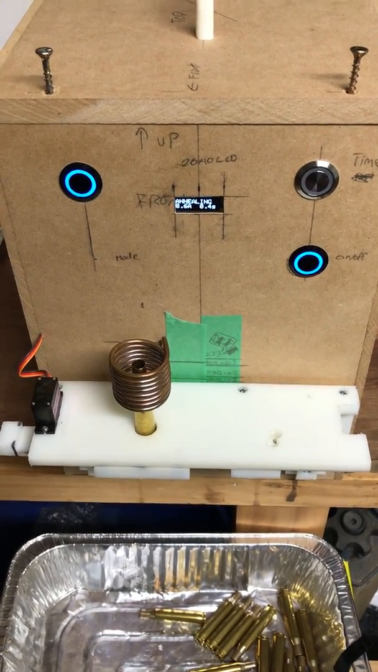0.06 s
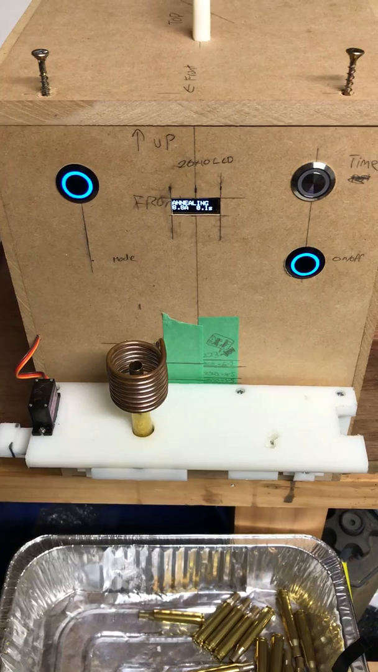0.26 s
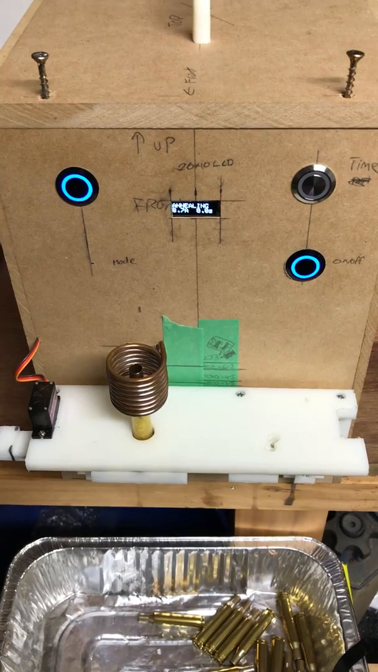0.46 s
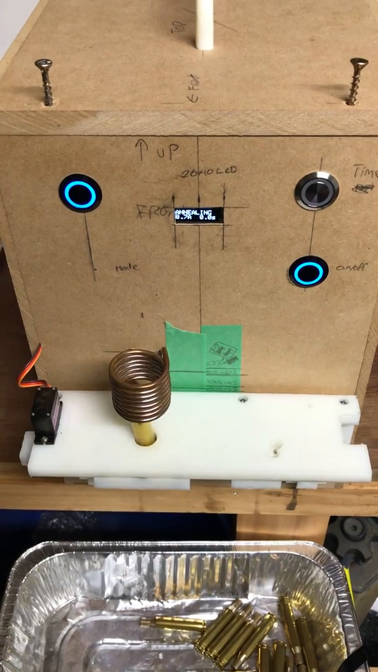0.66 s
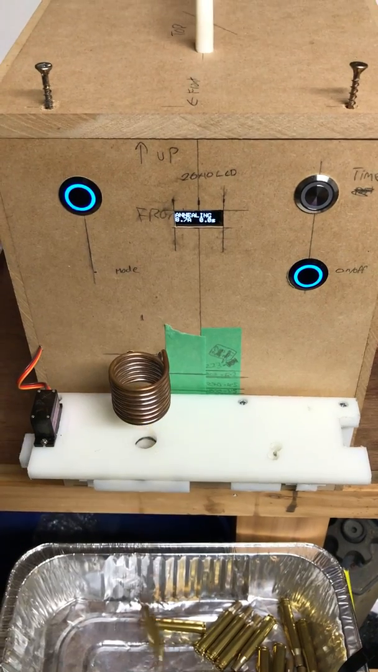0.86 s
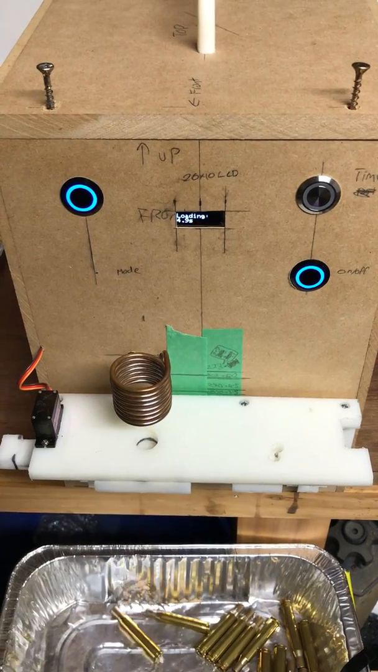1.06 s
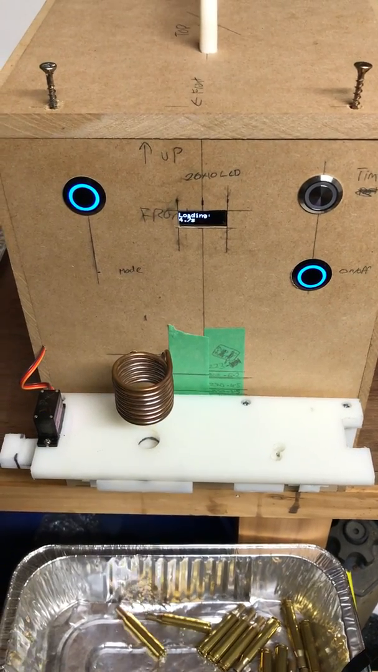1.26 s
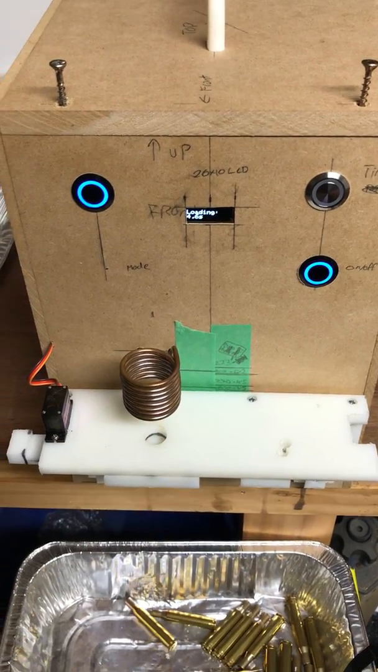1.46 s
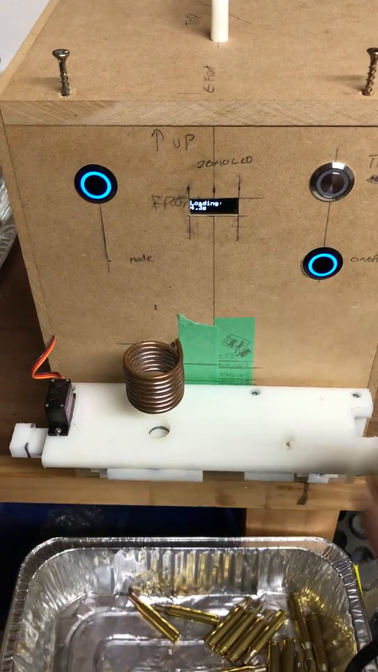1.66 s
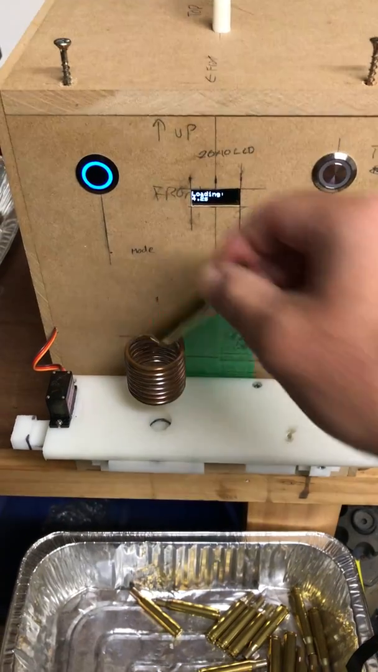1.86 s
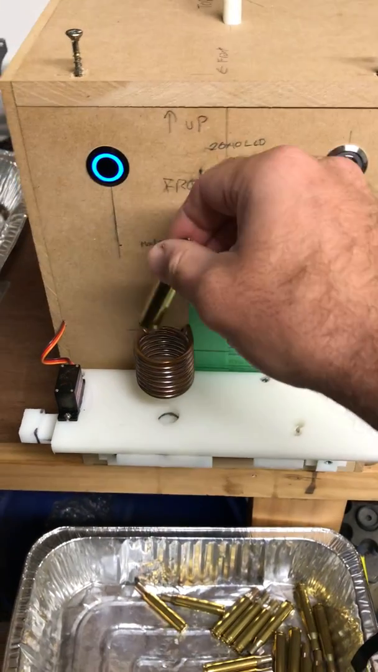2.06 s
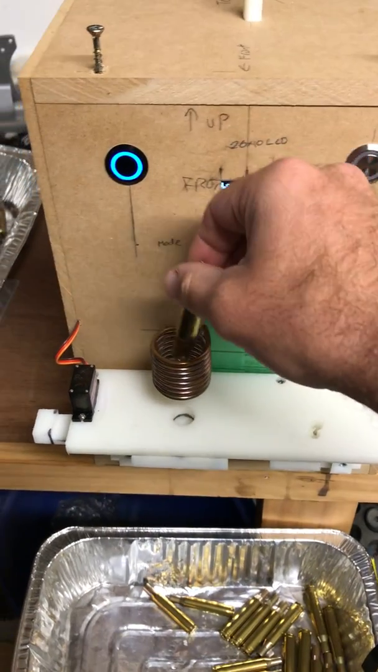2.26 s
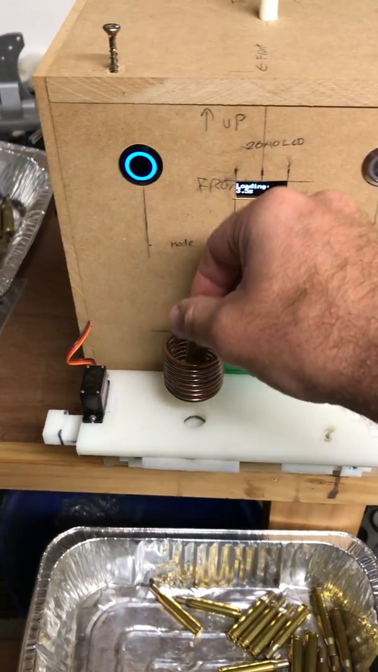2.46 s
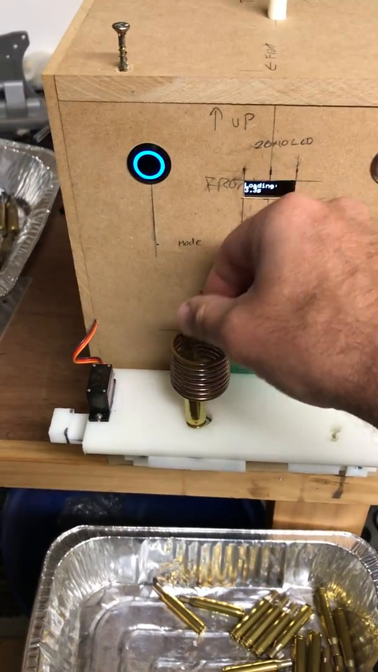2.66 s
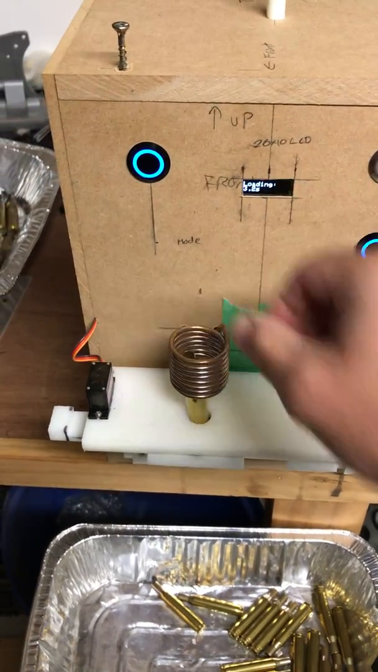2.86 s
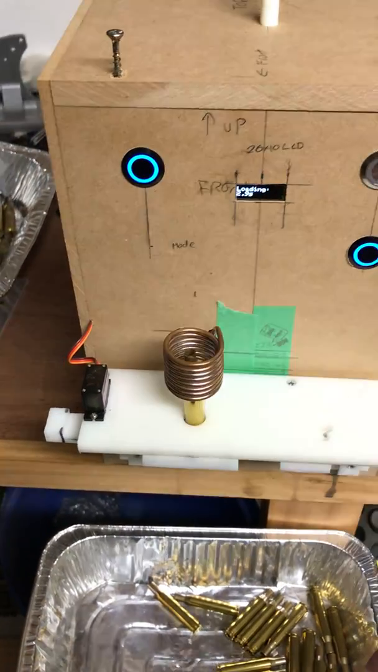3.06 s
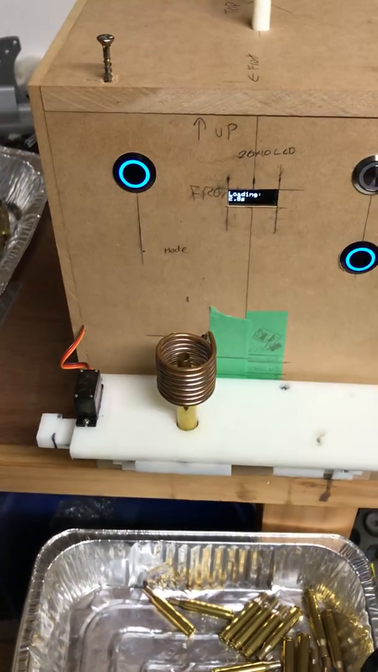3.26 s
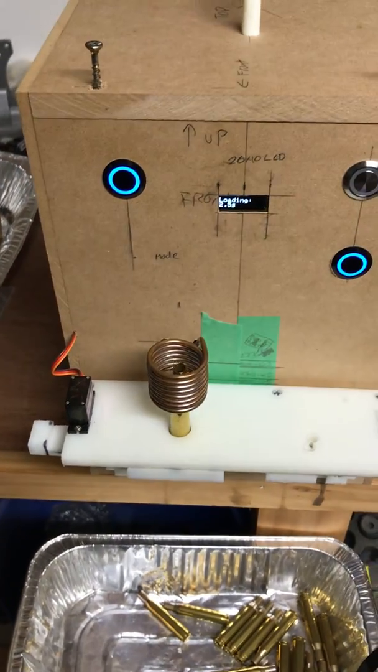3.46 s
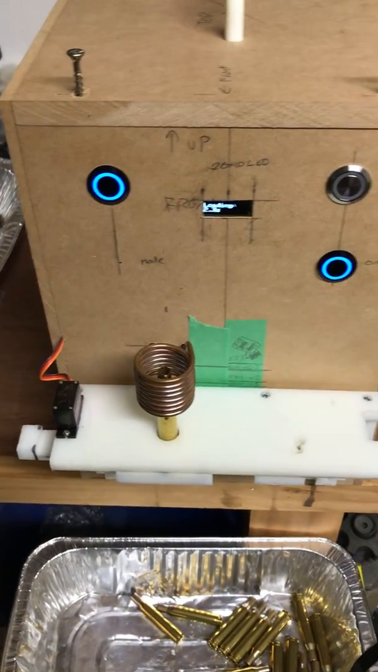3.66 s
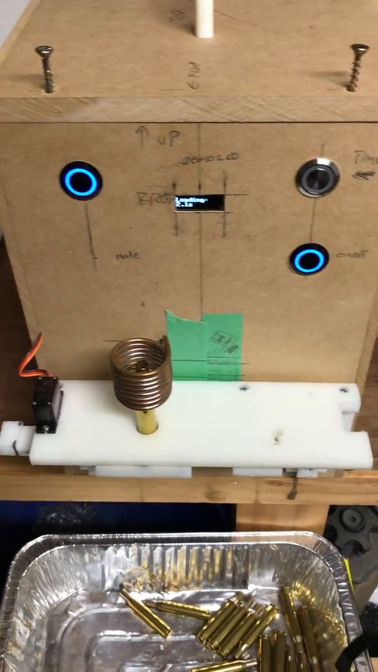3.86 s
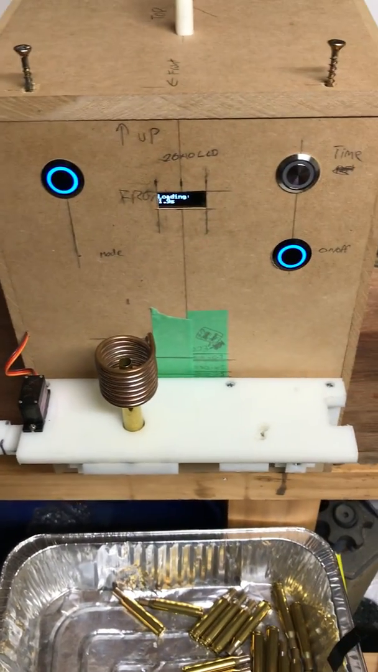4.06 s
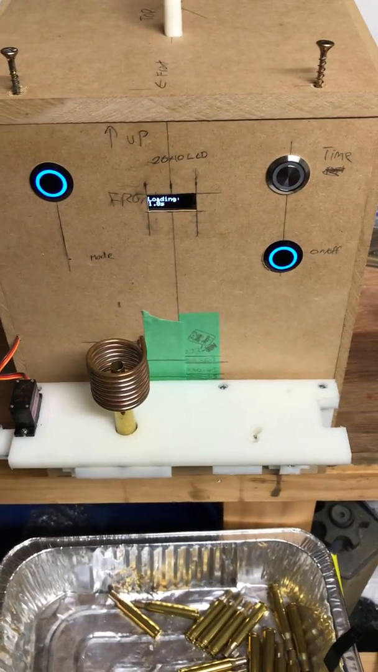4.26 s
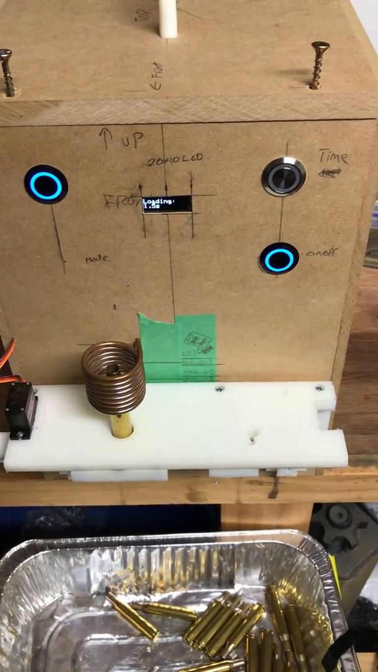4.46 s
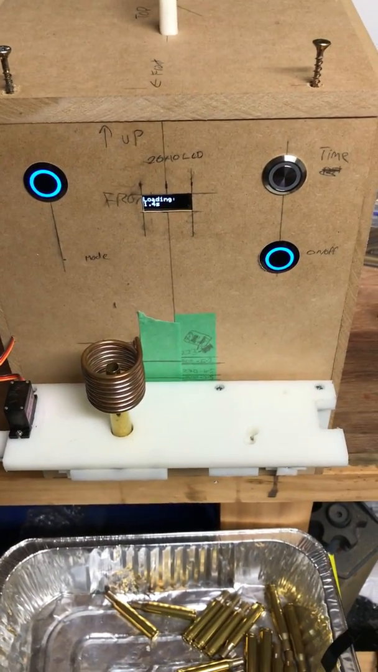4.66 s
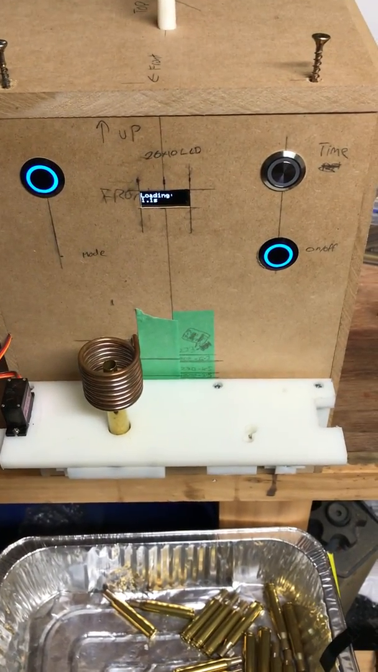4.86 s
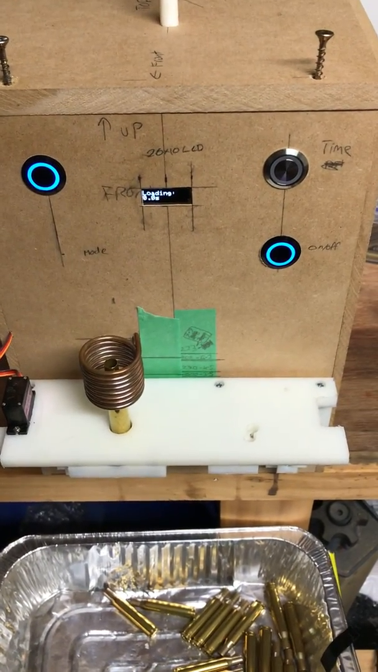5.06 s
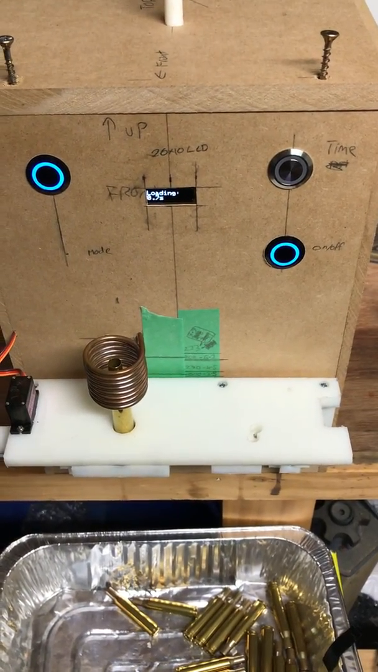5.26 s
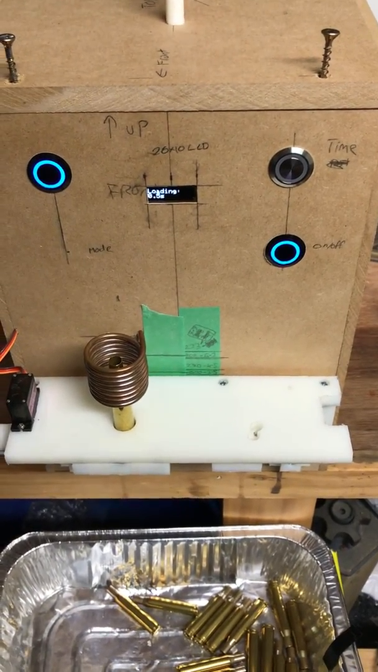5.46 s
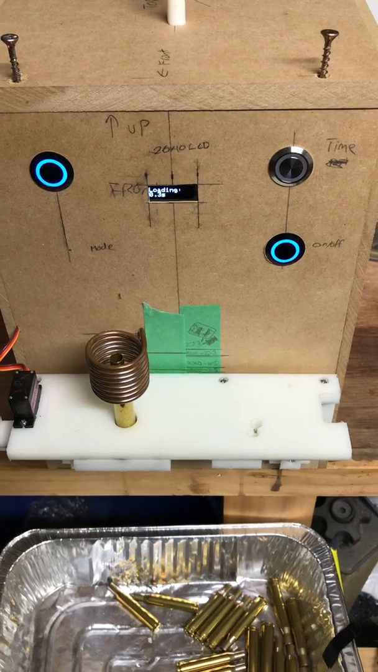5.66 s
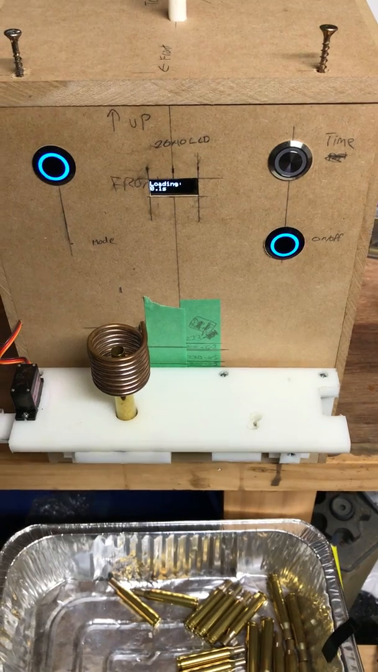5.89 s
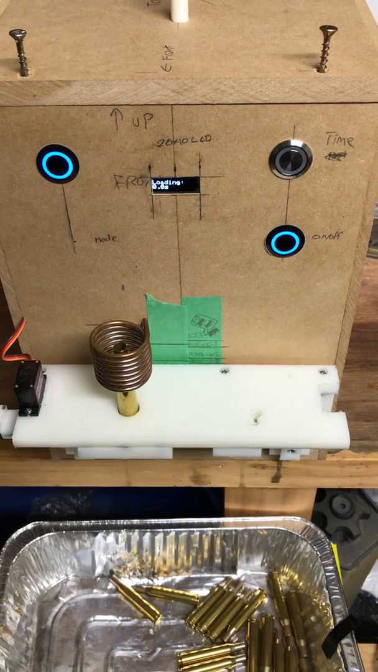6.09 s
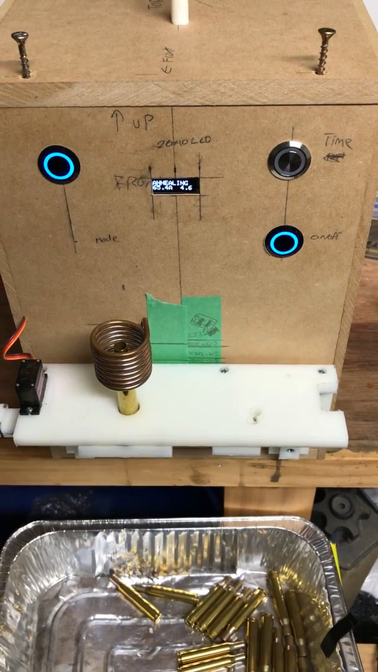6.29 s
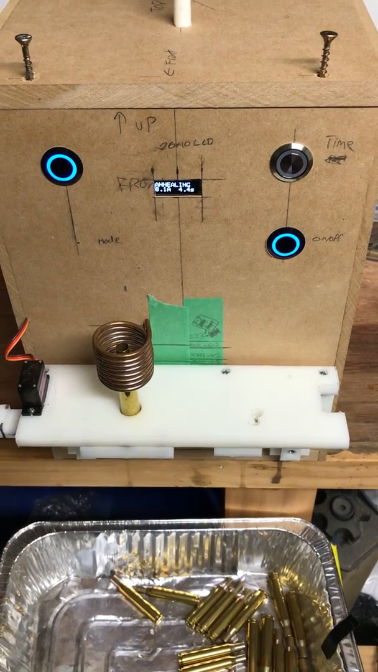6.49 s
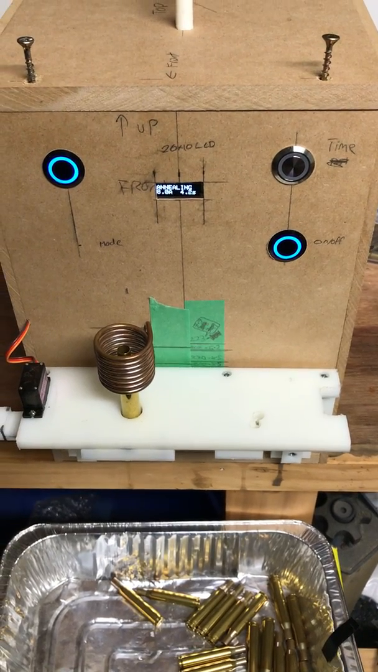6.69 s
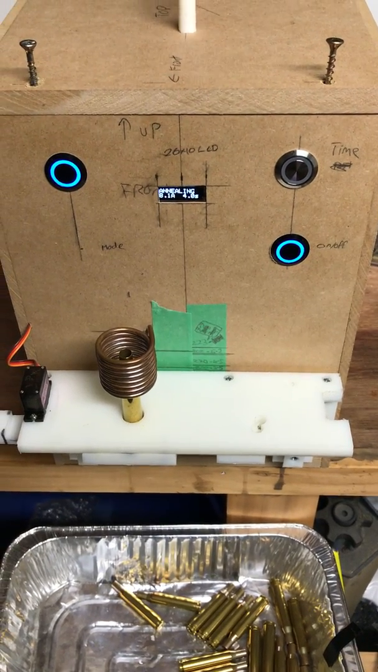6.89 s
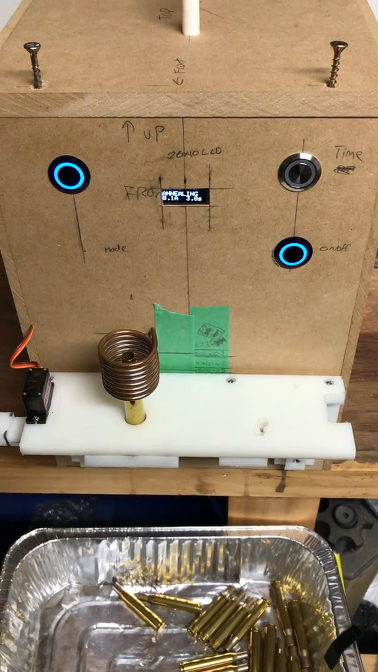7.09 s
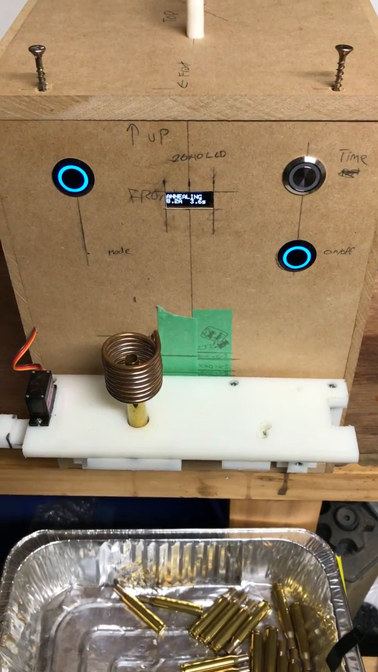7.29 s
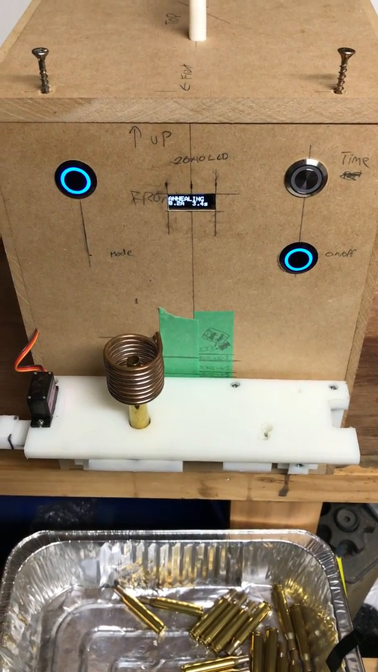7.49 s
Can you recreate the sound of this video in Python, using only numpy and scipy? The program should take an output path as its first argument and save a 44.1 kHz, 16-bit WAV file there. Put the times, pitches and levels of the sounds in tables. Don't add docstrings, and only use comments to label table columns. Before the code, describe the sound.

In a softly echoing workshop, a fan hums low. A small servo whines and knocks a plastic slide, then buzzes in quick pulses. A brass case lands in a foil tray with a loud crackling clatter, and clinks die away. After a pause, a new case knocks sharply into place with a thin ring. A faint sleeve brush and a relay click follow, close to a phone microphone.

```python
import sys
import numpy as np
from scipy import signal
from scipy.fft import rfft, irfft, next_fast_len
from scipy.io import wavfile
from scipy.ndimage import uniform_filter1d, map_coordinates

SR = 44100
rng = np.random.default_rng(int(sys.argv[2]) if len(sys.argv) > 2 else 0)


def pcm_store(signal):
    levels = np.round(np.clip(np.atleast_2d(signal), -1, 1) * 32767)
    wavfile.write(sys.argv[1], SR, levels.astype(np.int16).T)


def convert_level_to_amplitude(level_db):
    exponent = np.asarray(level_db, float) / 20
    return 10 ** exponent


N = 332205
TIME = np.arange(N) / SR

# t/s, gear mesh f/Hz, effort level/dB
SERVO_PULL = [(.612, 4400, -50), (.648, 4200, -35), (.664, 3620, -31), (.696, 3164, -26), (.714, 3170, -26),
              (.716, 2770, -26), (.733, 2693, -29), (.737, 2200, -25), (.768, 2300, -50)]
# f/Hz, level/dB
HOUSING_RESPONSE = [(1500, -15), (2800, -17.5), (4300, 4), (5600, 0.5), (7000, -4), (8300, -10),
                    (9500, 1.5), (10800, -11.5), (12700, -1), (14000, -14.5), (16000, -18)]
# f/Hz, level/dB, time to fade by 60 dB t60/s
HOUSING_TONES = [(4250, 0, .03), (5350, -2, .025), (6300, -4, .02), (7050, -4, .025), (9600, -14, .02)]
# start t/s, attack t/s, hold t/s, release t/s, level/dB, droop over the hold/dB
GEAR_RASPS = [
    (0.571, .002, .04, .02, -33.5, -3),
    (.608, .02, .138, 0.0078, -29, -3),
    (0.976, .002, .021, .002, -35, 3.5),
]
# f/Hz, level/dB
RASP_COLOUR = [(250, -56), (800, -22.5), (2500, -12), (3700, -8.5), (4200, 0), (4700, -5.5), (7000, -3.5),
               (8200, -9.5), (9500, -6), (10800, -11), (12700, -4), (15500, -9.5), (17000, -40.5)]
# start t/s, attack t/s, hold t/s, release t/s, level/dB, droop/dB
SQUEAL_SWELL = (.617, .006, .07, .02, -28, -12)
HOLDING_SWELL = (.765, .005, .205, .003, -49, -10)
# f/Hz, level/dB per Hz
STRAIN_COLOUR = [(1290, -35.5), (2200, -4.5), (2920, -12.5), (4200, 1.5), (5350, -1), (7030, -5),
                 (7640, -16.5), (9640, -18.5), (16000, -32)]
# t/s, peak level/dB
STRAY_TWITCHES = [(.9514, -39), (.972, -41)]

# t/s, peak level/dB, then thud, clack and tick relative level/dB
SLIDE_KNOCKS = [
    (0.574, -14.5, -26.5, -9.5, -21),
    (0.736, -21.5, -10.5, 2.5, -12),
    (0.802, -25, -17, -23, -24.5),
    (0.819, -29.5, -10.5, -15.5, -20),
    (2.662, -7.5, -15, -11.5, -16),
    (2.722, -25.5, -25.5, -0.5, -12.5),
    (2.828, -23.5, -9.5, 1, -5),
    (2.865, -18, -9, -12, -18),
    (2.884, -9.5, -14.5, -1.5, -19),
]
# f/Hz, level/dB, t60/s
SLIDE_TONES = [
    [(236, 1, 0.15), (364, 3.5, 0.24), (645, -6.5, 0.26)],
    [(931, 1.5, 0.05), (1210, 3.5, .03), (1630, -3.5, .04), (1870, -1.5, 0.01), (2460, -15.5, 0.032)],
]
# t/s, f/Hz, level/dB,
# t60/s
KNOCK_NOTES = [(.575, 1910, -25.5, 0.06), (.738, 551.3, -41, 0.07), (.803, 600, -44, 0.18),
               (0.631, 373, -40.5, 0.4), (0.801, 1760, -29, 0.035), (.810, 1850, -40, 0.044),
               (.803, 9455, -51, 0.11), (2.6628, 931, -10.5, 0.0373), (2.6627, 1200, -15, 0.024),
               (2.6628, 1700, -17, 0.053), (2.664, 230, -22.5, 0.14), (2.831, 990, -39.5, 0.29),
               (2.83, 2230, -36, 0.071), (2.864, 1738, -20, 0.0436), (2.884, 4003, -14.5, 0.014),
               (2.885, 6450, -25, .015), (2.885, 1130, -24.5, 0.073)]

# t/s, level/dB
FOIL_SHAKE = [(1.0004, -17.5), (1.017, -15), (1.039, -27), (1.075, -26.5), (1.17, -37), (1.455, -53.5),
              (1.55, -73.5), (1.6, -58.5), (1.7, -71)]
# f/Hz, level/dB per Hz
FOIL_COLOURS = [
    [(15, -59.5), (25, -33), (54, -13), (130, -12), (173, -15.5), (210, -8), (340, -2), (583, -18),
     (900, -10.5), (1170, -37), (1980, -120)],
    [(290, -34), (500, 1.5), (759, -9), (888, 2.5), (1080, -1.5), (2060, -5.5), (2440, -9.5), (4000, -15),
     (5200, -40.5), (8800, -120)],
    [(1500, -29), (2500, -5.5), (4500, -9.5), (7500, -10.5), (12000, -12.5), (15500, -15), (17000, -39.5)],
]
# level/dB at the reference, swing (dB per dB), build-up t/s,
# lumps/dB, lumps per second f/Hz
FOIL_FOLLOW = [
    (0.5, .95, .005, 1, 100),
    (-2.5, .95, .012, 1.5, 140),
    (-7.5, 1.3, .002, 3, 300),
]
# t/s, peak level/dB, ring f/Hz, brightness level/dB
CASE_CLINKS = [(1.0006, -7, 2040, -15), (1.006, -6, 3360, -21), (1.0181, -7, 3400, -22),
               (1.0618, -16, 2350, -2), (1.1097, -24, 3270, 4), (1.126, -25, 1600, -11.5),
               (1.171, -24, 3100, -10), (1.18, -28.5, 2000, -9), (1.2133, -29, 2260, -16),
               (1.2446, -33, 1980, -11.5), (1.279, -29.5, 2940, -9), (1.329, -30.5, 2770, -18),
               (1.3642, -39, 3150, -20), (1.3886, -36.5, 2800, -16), (1.4072, -35, 2910, -9),
               (1.4214, -37, 3056, -5), (1.4326, -37.5, 3010, -1), (1.447, -39.5, 3670, -10),
               (1.4985, -47, 1970, -14), (1.5914, -48.5, 1500, -6)]
# t/s, then level/dB of each wall tone
LOOSE_BLOWS = [(1.018, -50, -34, -47, -37), (1.056, -38, -21.5, -39, -28), (1.125, -37, -35, -37, -42),
               (1.172, -54, -51, -48, -56), (1.214, -65.5, -47, -59, -66), (1.592, -56, -50, -80, -75.5)]
# f/Hz, pair split f/Hz, t60/s, t60/s once seated
LOOSE_TONES = [(8300, 40, .1, .1), (9724, 9, .22, .22), (11100, 45, .22, .22), (14838, 20, .27, .27)]
# t/s, then level/dB of each wall tone
NEW_CASE_BLOWS = [(2.664, -73, -48.5, -70, -72), (2.722, -62, -54, -44, -52), (2.828, -54, -35, -46.5, -41),
                  (2.865, -50, -34.5, -77, -48)]
# f/Hz, pair split f/Hz, t60/s, t60/s once seated
NEW_CASE_TONES = [(8419, 9, .7, .55), (9771, 6, 1.2, .22), (11050, 14, .6, .5), (14910, 12, .7, .3)]

# t/s, level/dB
RELAY_SNAPS = [
    (6.3182, -25),
    (6.3205, -30),
]
# f/Hz, level/dB, t60/s
RELAY_TONES = [(1039, -2, .085), (1475, 1, .125), (1510, -6, .05), (820, -15, .04), (1782, -14, .03),
               (2200, -11, .02), (2853, -10, .02), (3400, -10, .02)]
# start t/s, attack t/s, hold t/s, release t/s, level/dB, droop/dB
SLEEVE_SWELL = (3.408, -0.01, 0.0657, 0.11, -56, -7)
# f/Hz, level/dB per Hz
CLOTH_COLOUR = [(710, -9), (1200, -2), (2390, -9), (2890, -6), (5100, -10.5), (12700, -10.5),
                (15600, -11.5), (16500, -31.5)]

# f/Hz, level/dB per Hz
AIR_COLOUR = [(15, -44.5), (25, -17), (48, -15.5), (103, -21), (135, -8.5), (159, -17.5), (197, -1.5),
              (226, -9), (389, -17), (422, -29), (600, -26.5), (1090, -29.5), (3230, -48), (15200, -60.5),
              (16500, -73.5)]
# f/Hz, width f/Hz, rms level/dB
BOX_RESONANCES = [(194.6, 20, -53.5), (393.4, 14, -68.5), (600, 76, -69.5), (913.3, 58, -74.5),
                  (734, 40, -80.5)]
# f/Hz, rms level/dB
BOX_HUM = (195, -54)
# multiple of the shaft rate, rms level/dB
SHAFT_ORDERS = [(1, -65), (2, -71), (3, -65), (6, -59.5), (12, -75), (20, -78.5), (25, -75)]
# f/Hz, t60/s
ROOM_FADE = [(150, 0.17), (1000, 0.53), (4000, .5), (12000, 0.36)]
# f/Hz, level/dB per Hz
HISS_COLOUR = [(4000, -29), (8000, -9), (10400, -11.5), (12000, 1), (15300, -1.5), (16500, -19.5)]


def unit(x):
    return x / np.sqrt(np.mean(x ** 2) + 1e-20)


def along(points, hz):
    f, v = np.transpose(points)
    return np.interp(np.log(hz + 1), np.log(f + 1), v)


def filtered(x, response):
    m = next_fast_len(len(x) + 8192)
    return irfft(rfft(x, m) * response(np.fft.rfftfreq(m, 1 / SR)), m)[:len(x)]


def wobble(rate):
    return map_coordinates(rng.standard_normal(int(N * rate / SR) + 4), [TIME * rate])


def noise(colour, grain_db=0, rate=300):
    lumpy = unit(convert_level_to_amplitude(grain_db * wobble(rate))) * rng.standard_normal(N)
    return unit(filtered(lumpy, lambda hz: convert_level_to_amplitude(along(colour, hz))))


def swell(s, attack_s, hold_s, release_s, db, droop_db):
    lengths = np.abs([0, attack_s, hold_s, release_s])
    levels = db + np.array([-16, 0, droop_db, droop_db - 18])
    return convert_level_to_amplitude(np.interp(TIME, s + np.cumsum(lengths), levels, left=-150, right=-150))


def ring(tones, scatter_db, attack=0.0012):
    t = TIME[:SR // 4]
    hz, db, t60 = np.transpose(tones)[:, :, None]
    gain = convert_level_to_amplitude(db + scatter_db * rng.standard_normal(db.shape) - 60 * t / t60)
    return (gain * np.sin(2 * np.pi * hz * t)).sum(axis=0) * (1 - np.exp(-t / attack))


def crack(lo_hz, hi_hz, t60):
    t = TIME[:SR // 4]
    band = signal.butter(2, [lo_hz, min(hi_hz, SR / 2.2)], "band", fs=SR, output="sos")
    return unit(signal.sosfilt(band, rng.standard_normal(len(t)))) * convert_level_to_amplitude(-60 * t / t60)


def add(track, s, sound):
    part = track[round(s * SR):][:len(sound)]
    part += sound[:len(part)]


def servo():
    return gear_whine() + gear_rasp() + holding_twitches()


def gear_whine():
    s, mesh_hz, db = np.transpose(SERVO_PULL)
    mesh = np.interp(TIME, s, mesh_hz)
    pulling = (TIME > s[0]) * (TIME < s[-1])
    effort = uniform_filter1d(convert_level_to_amplitude(np.interp(TIME, s, db)) * pulling, size=200)
    smooth_hz = 3010
    uneven = 0.0055 + 0.12 * np.abs(np.log(mesh / smooth_hz))
    x = np.zeros(N)
    for k in range(1, 7):
        hz = k * mesh * (1 + uneven * wobble(1200))
        flutter_db = 4.5 * wobble(300)
        gain = effort * convert_level_to_amplitude(along(HOUSING_RESPONSE, k * mesh) + flutter_db)
        audible = hz < SR / 2.6
        x += gain * audible * np.sin(2 * np.pi * np.cumsum(hz) / SR)
    return x


def gear_rasp():
    rasp = sum(swell(*row) for row in GEAR_RASPS) * noise(RASP_COLOUR, rate=500)
    squeal_colour = [(3000, -40), (3800, -10), (4200, 0.5), (4600, -10), (5500, -40)]  # f/Hz, level/dB
    squeal = swell(*SQUEAL_SWELL) * noise(squeal_colour)
    strain = swell(*HOLDING_SWELL) * noise(STRAIN_COLOUR, grain_db=2.5, rate=220)
    return convert_level_to_amplitude(-3) * rasp + convert_level_to_amplitude(-2) * squeal + strain


def holding_twitches():
    x = np.zeros(N)
    twitches = [(.8213 + .0199 * k, -35.5 + .45 * k) for k in range(8)]  # t/s, level/dB
    reverses = [(s - .0068, -48 + 1.6 * k) for k, (s, _) in enumerate(twitches)]
    for s, db in twitches + reverses + STRAY_TWITCHES:
        twitch = .4 * ring(HOUSING_TONES, scatter_db=3, attack=.0003)
        twitch += 1.5 * crack(4000, 7400, .025) + .25 * crack(8500, 15000, .012)
        add(x, s, convert_level_to_amplitude(db - 8) * twitch)
    return x


def slide():
    x = np.zeros(N)
    for s, db, thud_db, clack_db, tick_db in SLIDE_KNOCKS:
        spot = [1 + 0.03 * rng.standard_normal(), 1, 1]
        thud, body = [ring(np.array(tones) * spot, scatter_db=4.5) for tones in SLIDE_TONES]
        body = .3 * body + crack(700, 2100, 0.044) + .15 * crack(400, 2600, .2)
        clack = 1.4 * crack(3000, 6200, 0.017) + 0.68 * crack(3500, 5500, .05)
        clack += 0.067 * crack(2640, 6000, 0.088)
        tick = crack(7000, 14000, 0.03)
        knock = body + convert_level_to_amplitude(thud_db - 7) * thud + convert_level_to_amplitude(clack_db - 0.5) * clack + convert_level_to_amplitude(tick_db - 0.5) * tick
        add(x, s, convert_level_to_amplitude(db - 8.5) * knock)
    for s, hz, db, t60 in KNOCK_NOTES:
        add(x, s, ring([(hz, db, t60)], scatter_db=1, attack=1 / hz / 2))
    return x


def tray():
    landing_s = 1.0004
    since = np.maximum(TIME - landing_s, 0)
    x = foil(since) + clinks() + brass(LOOSE_BLOWS, LOOSE_TONES)
    return x * (TIME > landing_s)


def foil(since):
    s, db = np.transpose(FOIL_SHAKE)
    reference_db = -27
    swing_db = np.interp(TIME, s, db, right=-150) - reference_db
    x = convert_level_to_amplitude(-5.5 - 60 * since / .07) * (1 - np.exp(-since / .004)) * noise(FOIL_COLOURS[0])
    for colour, (db, swing, build_s, lumps_db, rate) in zip(FOIL_COLOURS, FOIL_FOLLOW):
        gain = convert_level_to_amplitude(reference_db + db + swing * swing_db) * (1 - np.exp(-since / build_s))
        x += gain * noise(colour, lumps_db, rate)
    return x


def clinks():
    x = np.zeros(N)
    for s, db, hz, bright_db in CASE_CLINKS:
        tone = ring([(hz, 0, .035), (hz * 1.25, -6, .025)], scatter_db=1, attack=.0003)
        tap = crack(2200, 6500, 0.02)
        rustle = .9 * crack(2400, 3800, .045) + 0.54 * crack(2000, 5700, 0.11)
        click = convert_level_to_amplitude(bright_db + 2.5) * crack(7000, 18000, 0.01792)
        add(x, s, convert_level_to_amplitude(db - 9.5) * (tone + tap + rustle + click))
    return x


def brass(blows, tones):
    x, t = np.zeros(N), TIME[:SR // 2]
    seated_s = 2.885
    for s, *dbs in blows:
        free = np.minimum(t, max(seated_s - s, 0))
        for (hz, split_hz, t60, seated_t60), db in zip(tones, dbs):
            beat = 1 + 0.5 * np.exp(1j * (2 * np.pi * split_hz * t + rng.uniform(0, 2 * np.pi)))
            fade_db = -60 * (free / t60 + (t - free) / seated_t60)
            add(x, s, convert_level_to_amplitude(db + fade_db) * np.imag(beat * np.exp(2j * np.pi * hz * t)))
    return x


def relay():
    x = np.zeros(N)
    for s, db in RELAY_SNAPS:
        wall = ring(RELAY_TONES, scatter_db=1, attack=0.0011) + 0.23 * crack(770, 1020, 0.15)
        wall += 0.21 * crack(1700, 3170, 0.043) + 0.032 * crack(1480, 3270, 0.36)
        spring = 0.42 * crack(5850, 6600, 0.023) + 0.021 * crack(5500, 6600, 0.37)
        spring += 0.021 * crack(9200, 15500, 0.21)
        click = 0.31 * crack(6000, 16000, .02)
        add(x, s, convert_level_to_amplitude(db) * (wall + spring + click))
    add(x, 6.367, convert_level_to_amplitude(-67) * crack(5600, 6000, .15))
    return x


def sleeve():
    return swell(*SLEEVE_SWELL) * noise(CLOTH_COLOUR, grain_db=1.3, rate=150)


def fan():
    x = convert_level_to_amplitude(-51 + 0.32 * wobble(2.3)) * noise(AIR_COLOUR)
    for hz, width, db in BOX_RESONANCES:
        peak = filtered(rng.standard_normal(N), lambda f: 1 / (1 + ((f - hz) / width * 2) ** 2))
        x += convert_level_to_amplitude(db) * unit(peak)
    hum_hz, hum_db = BOX_HUM
    hum_phase = 2 * np.pi * np.cumsum(hum_hz + 2.2 * wobble(4)) / SR
    x += convert_level_to_amplitude(hum_db + 2 + 1.5 * wobble(5)) * np.sin(hum_phase)
    shaft_hz = 44.7 * (1 + 0.0039 * wobble(1.3))
    turn = 2 * np.pi * np.cumsum(shaft_hz) / SR
    for k, db in SHAFT_ORDERS:
        waver_db = 2.5 * wobble(9)
        x += convert_level_to_amplitude(db + 1.5 + waver_db) * np.sin(k * turn)
    return x


def workshop(x):
    wet, size = np.zeros(N), SR // 8
    for start in range(0, N, size):
        hz, t, z = signal.stft(rng.standard_normal(SR // 2), SR, nperseg=256)
        fade = convert_level_to_amplitude(-60 * t / along(ROOM_FADE, hz)[:, None])
        tail = signal.istft(z * fade, SR, nperseg=256)[1]
        echo = signal.fftconvolve(x[start:start + size], tail / np.linalg.norm(tail))
        add(wet, start / SR + 0.0041, echo)
    return wet


def radio_ticks():
    x = np.zeros(N)
    for s in np.arange(.0460, N / SR, .10241):
        add(x, s, convert_level_to_amplitude(-65) * crack(11000, 16000, .003))
    return x


def scene():
    motor, knocks, cases, switch = servo(), slide(), tray(), relay()
    near = motor + knocks + cases + switch + brass(NEW_CASE_BLOWS, NEW_CASE_TONES) + sleeve()
    to_room = convert_level_to_amplitude(-24) * motor + convert_level_to_amplitude(-18) * knocks + convert_level_to_amplitude(-17) * cases + convert_level_to_amplitude(-18) * switch
    hiss = convert_level_to_amplitude(-87) * noise(HISS_COLOUR)
    return (near + workshop(to_room) + fan() + hiss)[None]


def low_pass(x):
    return signal.sosfilt(signal.butter(12, 16990, fs=SR, output="sos"), x)


def record(dry):
    x = dry[0] + radio_ticks()
    x = filtered(x, lambda f: 1 / (1 + (38 / (f + 1)) ** 8) / (1 + (f / 15900) ** 60))
    x = x / (1 + np.abs(x / .75) ** 4) ** (1 / 4)
    return low_pass(x[None])


dry = scene()
out = record(dry)
pcm_store(out)
```